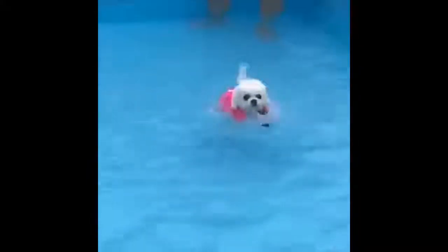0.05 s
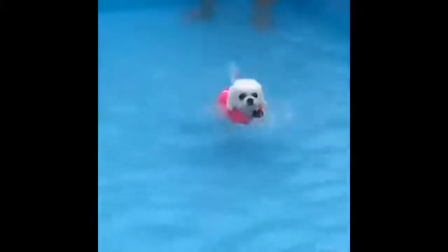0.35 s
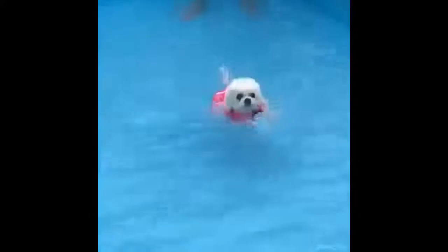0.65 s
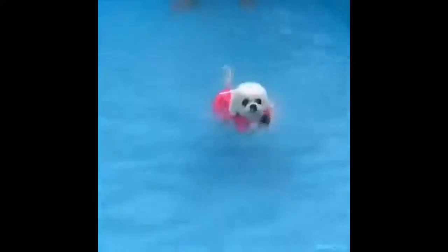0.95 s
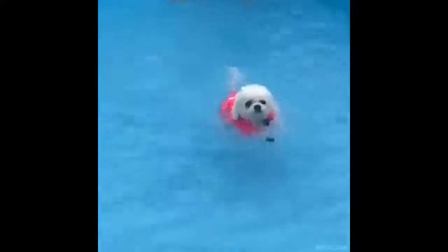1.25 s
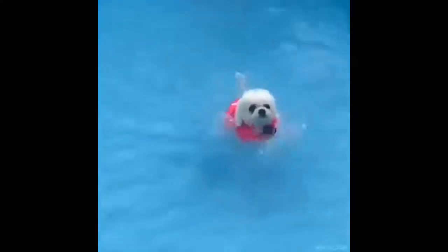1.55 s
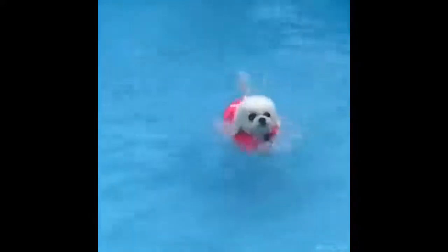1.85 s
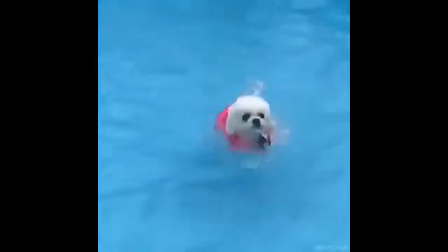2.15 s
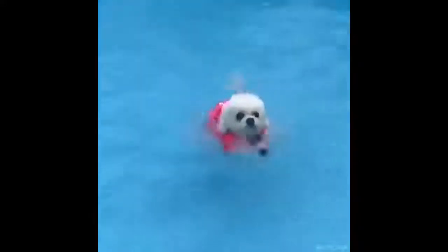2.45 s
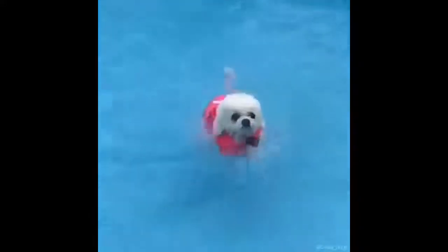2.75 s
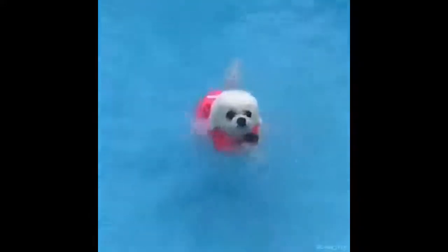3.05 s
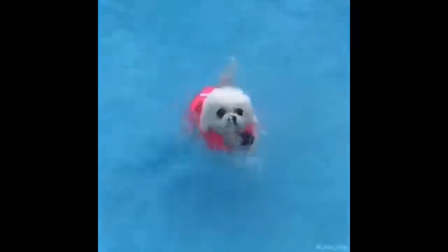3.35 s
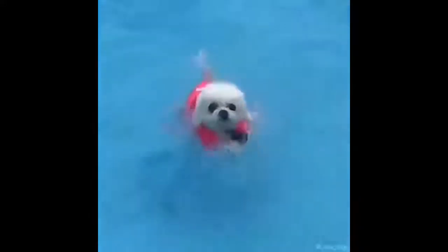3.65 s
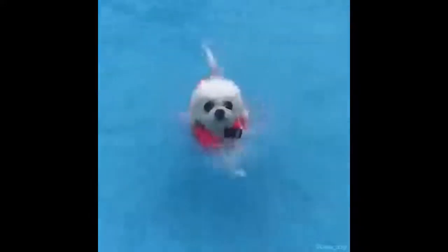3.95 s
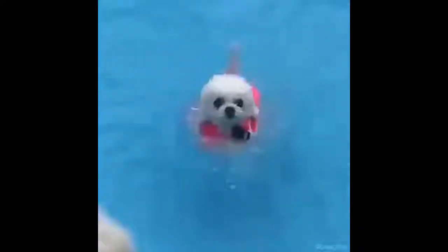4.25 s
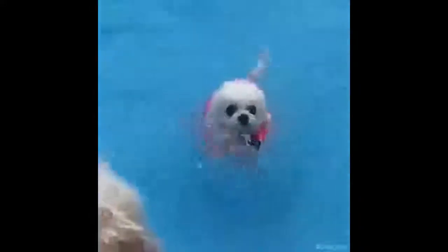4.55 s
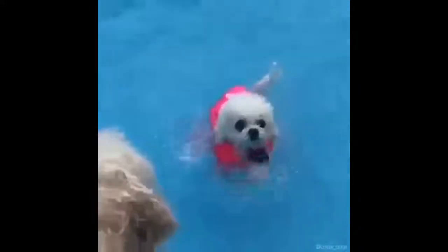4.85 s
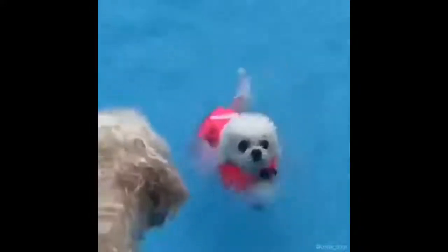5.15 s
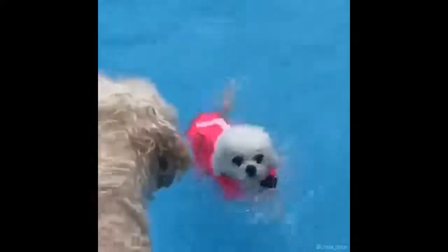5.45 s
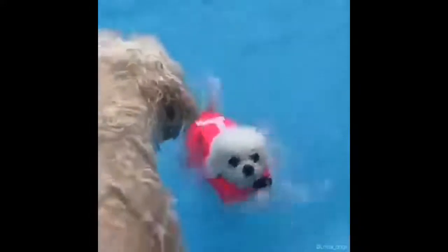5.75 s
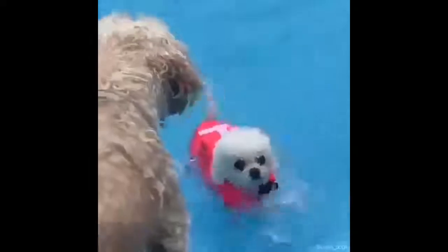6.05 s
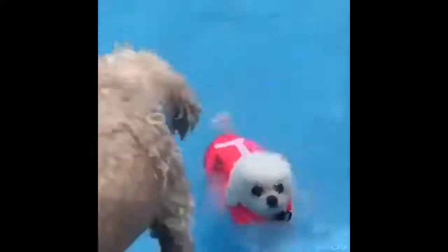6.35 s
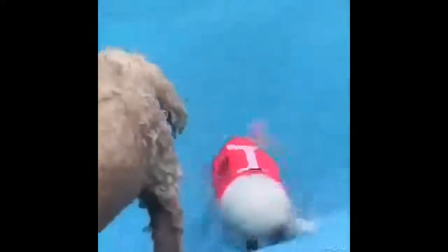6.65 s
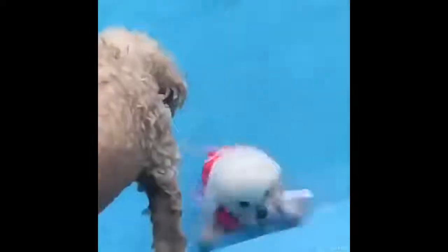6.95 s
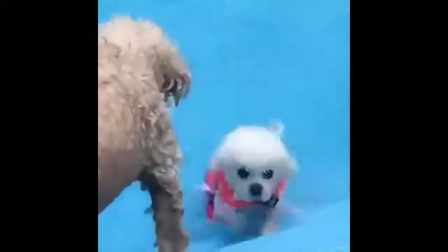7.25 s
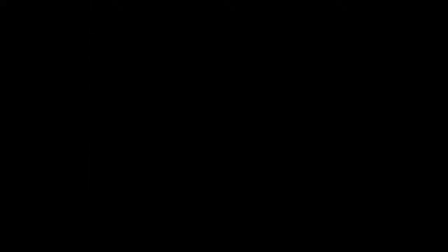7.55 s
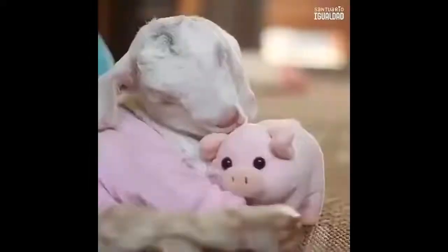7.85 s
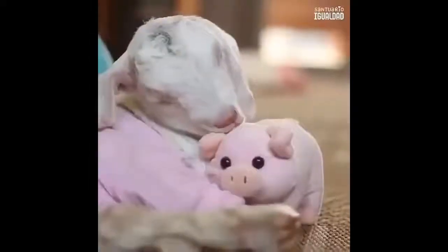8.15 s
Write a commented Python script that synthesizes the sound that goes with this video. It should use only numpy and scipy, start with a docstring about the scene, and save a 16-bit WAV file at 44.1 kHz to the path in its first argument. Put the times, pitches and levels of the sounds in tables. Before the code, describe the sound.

From the first moment, a small dog is heard paddling through a swimming pool: light, uneven splashes, about seven or eight a second, over continuous sloshing and gurgling. Each stroke throws a fizzy spray, with small paw slaps, low gulps of trapped air and single plinking bubbles scattered throughout. A low, wavering hum and a soft rumble sit underneath the whole time. Drops tick brightly on the water, most clearly in the first second and a half. The paddling carries on at much the same strength, with more noticeable gulps at around 5, 5.6 and 7 seconds. From about 6.5 seconds the splashes become a little gentler, and at about 7.7 seconds all the sound stops short. It is in mono, with a faint, short echo around the pool.

```python
"""Splashing and churning water is heard first, over a low hum and a soft rumble: a small dog paddles
across a swimming pool, seven or eight paw strokes a second, in mono. Each stroke throws spray and
stirs up bubbles, which ring as damped oscillators, the smaller the higher. Pockets of air gulp shut,
paws slap the surface, drops tick and single bubbles plink. The sound stops short near the end."""
import sys
import numpy as np
from scipy import signal
from scipy.fft import rfft, irfft, next_fast_len
from scipy.io import wavfile
from scipy.ndimage import map_coordinates

SR = 44100
rng = np.random.default_rng(int(sys.argv[2]) if len(sys.argv) > 2 else 0)


def output_pcm(signal):
    """Save a mono or channel-first signal as 16-bit PCM at the path in sys.argv[1].

    Samples are clipped to [-1, 1] before scaling.
    """
    pcm = np.clip(np.atleast_2d(signal).T, -1, 1) * 32767
    wavfile.write(sys.argv[1], SR, np.round(pcm).astype(np.int16))


N = 366471

# Levels are relative within each table.
# paw strokes: t/s, spray level/dB, time to fade by 10 dB/s, churn level/dB
PAW_STROKES = [(0, -35.5, 0.074, -37), (0.175, -32.5, 0.1, -39.5), (0.308, -37.5, 0.082, -40),
               (0.386, -30.0, 0.039, -41), (0.451, -37, 0.14, -43.5), (0.593, -33, 0.05, -49),
               (0.659, -36.5, 0.119, -42.5), (0.811, -29.5, 0.02, -34.5), (0.924, -35.5, 0.16, -46),
               (1.032, -36.5, 0.071, -40.5), (1.116, -38.5, 0.06, -41), (1.173, -34, 0.044, -40),
               (1.241, -34, 0.026, -35.5), (1.328, -32, 0.03, -38.0), (1.441, -31, 0.072, -40),
               (1.609, -32, 0.072, -55), (1.698, -37.0, 0.12, -38), (1.842, -33.5, 0.052, -48),
               (1.911, -35, 0.075, -40), (2.085, -34, 0.088, -41.5), (2.303, -37.5, 0.21, -41),
               (2.446, -37, 0.05, -39), (2.593, -34.5, 0.12, -39), (2.722, -41.5, 0.1, -40),
               (2.785, -33.5, 0.1, -43), (2.98, -34.5, 0.109, -37.5), (3.169, -32.5, 0.084, -36),
               (3.308, -34.0, 0.078, -51), (3.408, -34.5, 0.065, -38.5), (3.573, -35, 0.1, -36.5),
               (3.682, -36.5, 0.07, -42.5), (3.788, -34.5, 0.097, -38.5), (4.01, -32.5, 0.139, -40),
               (4.214, -32, 0.11, -40), (4.349, -37, 0.053, -37), (4.458, -33, 0.13, -40.5),
               (4.608, -34, 0.102, -39.5), (4.752, -31.5, 0.065, -42), (4.941, -34.0, 0.15, -37),
               (5.079, -34, 0.011, -41.5), (5.162, -33.5, 0.062, -35), (5.288, -40, 0.066, -41),
               (5.394, -32.5, 0.086, -41.5), (5.581, -34, 0.11, -39.5), (5.81, -35.5, 0.11, -40),
               (6.04, -36, 0.078, -36.5), (6.174, -37.5, 0.017, -55), (6.277, -33.5, 0.031, -38),
               (6.468, -37.5, 0.1, -44), (6.583, -45.5, 0.047, -52), (6.669, -39.5, 0.1, -42),
               (6.87, -36.5, 0.085, -48), (7.066, -37.5, 0.05, -35.5), (7.234, -38.5, 0.071, -44),
               (7.356, -44.5, 0.045, -44), (7.446, -36, -0.02, -44.0), (7.589, -36.5, 0.038, -40)]
# water between strokes, calming as the dog reaches the edge: t/s, spray level/dB, churn level/dB
WASH_LEVELS = [(0, -44, -38), (2, -40, -37.5), (4.5, -45, -39.5), (6, -42, -40), (7.6, -44, -40.5)]
# spectral envelopes of the four continuous sounds: f/Hz, level/dB
SPRAY_SPECTRUM = [(150, -17), (700, -12.5), (1300, -4), (2900, -0.5), (4200, -1), (4900, -3), (5900, -2.5),
                  (7500, -4), (10500, -3), (13500, -3)]
CHURN_SPECTRUM = [(60, -16), (130, -0.5), (250, 1.5), (450, 0.5), (650, 1.7), (770, 0), (970, 1.5),
                  (1500, -0.5), (1950, -3), (3200, -10), (6000, -16), (14000, -27)]
HUM_NOISE_SPECTRUM = [(20, -48.5), (42, -25), (54, -4), (60, 0.5), (72, -14), (120, -58)]
RUMBLE_SPECTRUM = [(15, -19), (30, -1), (45, -10), (72, -2.5), (94, 5.5), (125, 0.5), (170, -6.5),
                   (400, -27), (1500, -85)]
# resonance of the commonest bubble size: t/s, f/Hz
GURGLE_PITCH = [(0, 963), (1.8, 971), (3, 1111), (4.3, 1264), (5.8, 1300), (7.6, 1110)]
# slow envelopes of the hum and the rumble: t/s, level/dB
HUM_LEVEL = [(0, -41.5), (.2, -51.5), (.38, -47), (1.8, -54.5), (2.0, -47.5), (2.5, -48), (3.0, -59),
             (3.4, -50.5), (3.75, -62), (4.55, -46.5), (6.15, -60.5), (6.35, -47), (6.7, -50.5),
             (7.45, -38.5), (7.66, -46)]
RUMBLE_LEVEL = [(0, -48), (1.0, -43.5), (1.22, -53.5), (1.4, -49.5), (2.85, -48), (3.35, -54), (4.05, -50),
                (4.85, -51), (5.1, -50.5), (6.1, -45), (6.55, -53), (7.1, -48), (7.6, -48)]
# air pockets closing: t/s, duration/s, first f/Hz, last f/Hz, level/dB
AIR_POCKETS = [(0.125, 0.021, 312, 375, -28.5), (.41, 0.025, 191, 160, -35.5),
               (1.304, 0.02, 304, 248, -31.5), (1.537, 0.041, 177, 280, -30.5),
               (1.726, 0.022, 245, 210, -33), (1.948, 0.049, 261, 170, -35), (2.149, 0.058, 104, 95, -34),
               (2.435, 0.0286, 160, 110, -34.5), (2.485, 0.03, 218, 200, -36),
               (2.563, 0.054, 107, 89.5, -34), (3.145, 0.038, 250, 179, -33), (3.546, 0.039, 133, 84, -33),
               (3.763, 0.009, 300, 210, -27.5), (3.955, 0.041, 203, 109, -34.5),
               (4.34, 0.017, 450, 390, -29.5), (4.355, 0.024, 300, 117, -26.5),
               (4.988, 0.027, 300, 130, -30.5), (5.019, 0.0396, 135, 450, -22.5),
               (5.182, 0.055, 129, 109, -34.5), (5.622, 0.019, 169, 150, -23.5),
               (5.808, 0.043, 223, 182, -35), (6.27, 0.013, 260, 224, -26), (6.325, 0.048, 119, 129, -36),
               (6.675, 0.0206, 205, 166, -27), (6.811, 0.016, 334, 190, -26),
               (6.942, 0.074, 147.5, 115.7, -24)]
# paws slapping the surface: central t/s, width parameter/s, central f/Hz, level/dB
PAW_SLAPS = [(.139, .004, 950, -34.5), (.156, 0.006, 1520, -30), (1.9, 0.015, 1000, -38.5),
             (2.072, .008, 2700, -40), (2.346, 0.0057, 1700, -38), (2.413, .005, 1900, -35),
             (2.94, .009, 1140, -37.5), (3.16, 0.0098, 1220, -36), (3.47, 0.01, 1170, -38),
             (3.766, .002, 1103, -33), (4.59, 0.0092, 920, -35.5), (5.178, 0.0075, 1700, -34.5),
             (5.402, .015, 1660, -33), (5.58, 0.01, 473, -36.5), (5.628, 0.0056, 1260, -32.5),
             (5.631, 0.0047, 340, -33), (5.801, 0.0044, 1410, -37.5), (6.279, 0.00522, 1134, -31),
             (6.687, 0.0065, 635, -37.5), (6.955, .016, 428, -38), (6.98, 0.018, 870, -38.5),
             (7.075, 0.012, 1380, -41.5), (7.435, 0.009, 1100, -40.5)]
# single drops striking the water: t/s, level/dB
DROP_IMPACTS = [(0.1704, -19), (0.2503, -16.5), (0.286, -13), (0.7756, -22), (1.1049, -27.5),
                (1.1692, -11.5), (1.3129, -17), (1.5225, -17), (3.5703, -27), (3.7638, -29), (3.9838, -22),
                (4.2524, -22), (5.2909, -18), (5.7974, -20), (6.0217, -23), (6.6331, -30), (7.0658, -25.5)]
# single bubbles ringing out: t/s, f/Hz, level/dB
RINGING_BUBBLES = [(.25, 8300, -28.5), (0.621, 1580, -29.5), (1.103, 8740, -38), (1.24, 1514, -33),
                   (1.428, 900, -33), (1.436, 4690, -31), (1.832, 2186, -29), (1.834, 5900, -28.5),
                   (1.838, 4030, -31.5), (2.336, 2434, -34), (2.705, 6110, -34), (2.928, 1163, -39),
                   (3.112, 1845, -30.5), (3.79, 2540, -31), (4.06, 1965, -30.5), (4.372, 2500, -29),
                   (4.45, 1290, -34.5), (4.578, 823, -34), (5.08, 2600, -38), (5.289, 7450, -31),
                   (5.355, 6100, -30.5), (5.782, 8500, -32.5), (6.027, 5860, -27), (6.232, 7900, -35),
                   (6.52, 1332, -34), (6.632, 5500, -33.5), (6.676, 5400, -36)]


def amp(db):
    """Amplitude ratio of a level in decibels."""
    return 10 ** (np.asarray(db) / 20)


def unit(x):
    """Normalisation to rms 1."""
    return x / np.sqrt(np.mean(x ** 2) + 1e-20)


def curves(rows):
    """Linear interpolation of each column after the time, one value per sample."""
    times, *columns = np.transpose(rows)
    return [np.interp(np.arange(N) / SR, times, column) for column in columns]


def wobble(rate):
    """Smooth random modulation: a spline through Gaussian values, rate of them a second."""
    knots = rng.standard_normal(int(N * rate / SR) + 4)
    return map_coordinates(knots, [np.arange(N) * rate / SR])


def filtered(x, response):
    """Linear filtering: the spectrum of x is multiplied by a frequency response."""
    size = next_fast_len(len(x) + 8192)
    return irfft(rfft(x, size) * response(np.fft.rfftfreq(size, 1 / SR)), size)[:len(x)]


def coloured(x, spectrum):
    """Spectral shaping by (f/Hz, level/dB) points, at rms 1."""
    f, db = np.transpose(spectrum)
    return unit(filtered(x, lambda hz: amp(np.interp(np.log(hz + 1), np.log(f), db))))


def add(track, s, sound):
    """Superposition of a sound on the track from time s."""
    part = track[max(round(s * SR), 0):][:len(sound)]
    part += sound[:len(part)]


def stroke_envelopes():
    """Incoherent sources add in power: strokes and wash sum to the spray and churn amplitudes."""
    spray_power, churn_power = amp(curves(WASH_LEVELS)) ** 2
    t = np.arange(N) / SR
    roundness = 1.05  # 1 is a pointed peak, 2 a bell
    for s, spray_db, fade_s, churn_db in PAW_STROKES:
        near = t[max(int(s * SR) - SR // 2, 0):][:SR]
        swell = 10 ** -(np.abs((near - s) / fade_s) ** roundness)
        add(spray_power, near[0], amp(spray_db) ** 2 * swell)
        add(churn_power, near[0], amp(churn_db) ** 2 * swell)
    return np.sqrt(spray_power), np.sqrt(churn_power)


def bubbles(count, low_hz, high_hz, cycles, spread_db, rise, samples):
    """Bubble resonance: a cloud of damped sines whose pitch rises as they near the surface."""
    when, pitch, strength, life = rng.random((count, 4)).T[:, :, None]
    hz = low_hz + (high_hz - low_hz) * pitch
    t = np.arange(samples) / SR
    age = t * hz / (cycles * (.5 + life))  # 1 after 20 dB of damping
    strength_db = -spread_db * np.log(np.maximum(1 - strength, .01))  # many faint, a few strong
    phase = 2 * np.pi * hz * t * (1 + rise * np.minimum(age, 1))
    rings = amp(strength_db - 20 * age) * np.sqrt(hz) * (1 - t / t[-1]) * np.sin(phase)
    positions = (when * N + np.arange(samples)).astype(int)
    return unit(np.bincount(positions.ravel(), rings.ravel(), N)[:N])


def spray(envelope):
    """Impact and air entrainment: thrown water falls back as droplets and tiny ringing bubbles."""
    crackle = bubbles(16000, low_hz=1000, high_hz=14000, cycles=1.2, spread_db=2, rise=0, samples=48)
    fizz = bubbles(1400, low_hz=3000, high_hz=9010, cycles=150, spread_db=2, rise=.028, samples=900)
    trickle = bubbles(750, low_hz=1300, high_hz=3500, cycles=95, spread_db=1.4, rise=.012, samples=2200)
    hiss = unit(amp(-1) * crackle + amp(-9) * fizz + amp(2.5) * rng.standard_normal(N))
    flicker = amp(1.54 + wobble(80))
    return envelope * flicker * coloured(hiss + amp(-14) * trickle, SPRAY_SPECTRUM)


def pool_echo(x):
    """Reverberation: the pool walls and the buildings around return a short diffuse echo."""
    t60_s, build_up_s, echo_db = .3, .011, -10
    t = np.arange(SR // 2) / SR
    tail = rng.standard_normal(len(t)) * amp(-60 * t / t60_s) * (1 - np.exp(-t / build_up_s))
    return x + amp(echo_db) * signal.fftconvolve(x, tail / np.linalg.norm(tail))[:N]


def churn(envelope):
    """The legs stir in larger bubbles; resonances of like size merge into a narrow-band gurgle."""
    burble = bubbles(1500, low_hz=880, high_hz=3000, cycles=55, spread_db=1.2, rise=.025, samples=2200)
    lapping = bubbles(1700, low_hz=130.8, high_hz=1296, cycles=2.8, spread_db=2.5, rise=.1, samples=800)
    slosh = rng.standard_normal(N)
    water = coloured(amp(-8.5) * burble + amp(-15) * lapping + amp(-.5) * slosh, CHURN_SPECTRUM)
    gurgle_hz, = curves(GURGLE_PITCH)
    phase = 2 * np.pi * np.cumsum(gurgle_hz) / SR
    gurgle = unit(wobble(230) * np.cos(phase) + wobble(230) * np.sin(phase))
    flicker = amp(.78 * wobble(30) - 1.2)
    return pool_echo(envelope * flicker * (water + amp(-15) * gurgle))


def hum():
    """Beating: two close, wavering low tones interfere over a narrow band of noise."""
    level_db, = curves(HUM_LEVEL)
    upper, lower = (np.sin(2 * np.pi * np.cumsum(hz + 1.5 * wobble(6)) / SR) for hz in (55.15, 46.2))
    noise = coloured(rng.standard_normal(N), HUM_NOISE_SPECTRUM)
    return amp(level_db - 1.5) * unit(upper + amp(-8) * lower + amp(-9) * noise)


def rumble():
    """Amplitude modulation: soft low-frequency noise swells at random."""
    level_db, = curves(RUMBLE_LEVEL)
    swell_db = 2.7 * wobble(9)
    return amp(level_db + swell_db) * coloured(rng.standard_normal(N), RUMBLE_SPECTRUM)


def gulps():
    """Cavity resonance: the air behind a paw rings low, gliding in pitch as it deepens or comes up."""
    out = np.zeros(N)
    for s, duration_s, first_hz, last_hz, db in AIR_POCKETS:
        progress = np.linspace(0, 1, int(duration_s * SR))
        hz = first_hz * (last_hz / first_hz) ** progress
        swell = np.abs(np.sin(np.pi * progress ** .67))
        add(out, s, amp(db - 5) * swell * np.sin(2 * np.pi * np.cumsum(hz) / SR))
    return out


def slaps():
    """Air entrainment: a paw breaks the surface and traps a cluster of heavily damped bubbles."""
    out, t = np.zeros(N), np.arange(SR // 25) / SR
    centre_s, cycles = 1 / 8, 3.3
    for s, width, pitch_hz, db in PAW_SLAPS:
        cluster = np.zeros(SR // 4)
        for delay, detune, strength in rng.uniform(-1, 1, size=(30, 3)):
            hz = pitch_hz * np.exp(.28 * detune)
            ring = amp(2.7 * strength - 20 * t * hz / cycles) * np.sin(2 * np.pi * hz * t)
            add(cluster, centre_s + 1.5 * width * delay, ring)
        add(out, s - centre_s, amp(db) * unit(cluster) * np.sqrt(width * 10))
    return out


def drops():
    """A brief impact has a broad spectrum: bigger drops land with a bright tick."""
    out, t = np.zeros(N), np.arange(SR // 40) / SR
    t60_s = .0062
    for s, db in DROP_IMPACTS:
        add(out, s, amp(db - 8.5 - 60 * t / t60_s) * rng.standard_normal(len(t)))
    return signal.lfilter(*signal.butter(1, 1500, "high", fs=SR), out)


def plinks():
    """Constant-Q damping: each bubble loses 20 dB in 70 cycles, so small high ones die soonest."""
    out, t = np.zeros(N), np.arange(SR // 8) / SR
    for s, hz, db in RINGING_BUBBLES:
        age = t * hz / 70
        ring = np.sin(2 * np.pi * hz * t * (1 + .02 * np.minimum(age, 1)))
        attack = 1 - np.exp(-age / .12)
        add(out, s, amp(db + 1.5 - 20 * age) * attack * ring)
    return pool_echo(out)


def scene():
    """Superposition of water, hum and rumble, alike in both ears."""
    thrown, stirred = stroke_envelopes()
    pool = spray(thrown) + churn(stirred) + hum() + rumble() + gulps() + slaps() + drops() + plinks()
    return np.array([pool, pool])


def record(dry):
    """Band limiting and gating: the frequency extremes are cut, and a quick fade ends the sound."""
    low_hz, top_hz = 10, 13900
    stop_s, fade_s = 7.675, .031
    band = lambda hz: hz / np.hypot(hz, low_hz) / np.hypot(1, (hz / top_hz) ** 200)
    gate = np.clip((stop_s - np.arange(N) / SR) / fade_s + .5, 0, 1)
    return np.array([filtered(channel, band) for channel in dry]) * np.sin(np.pi / 2 * gate) ** 2


dry = scene()
out = record(dry)
output_pcm(out)
```